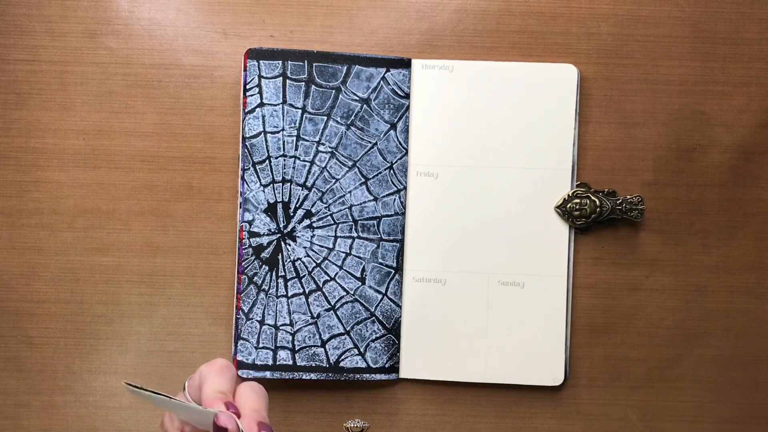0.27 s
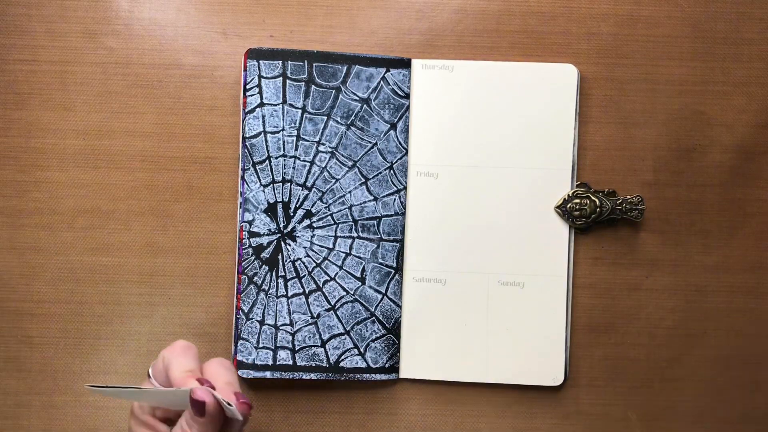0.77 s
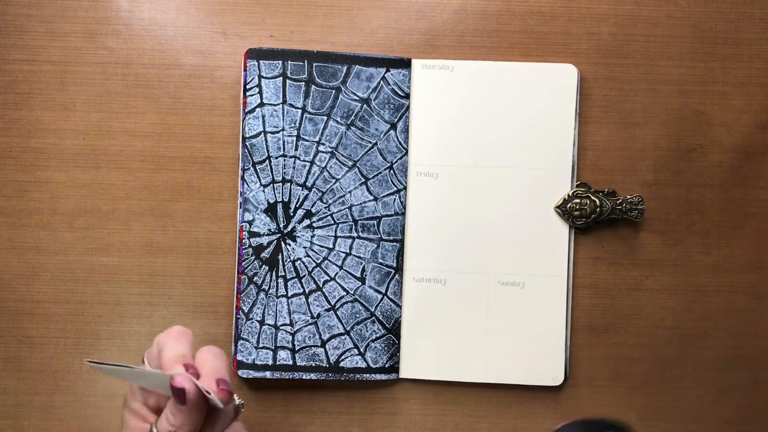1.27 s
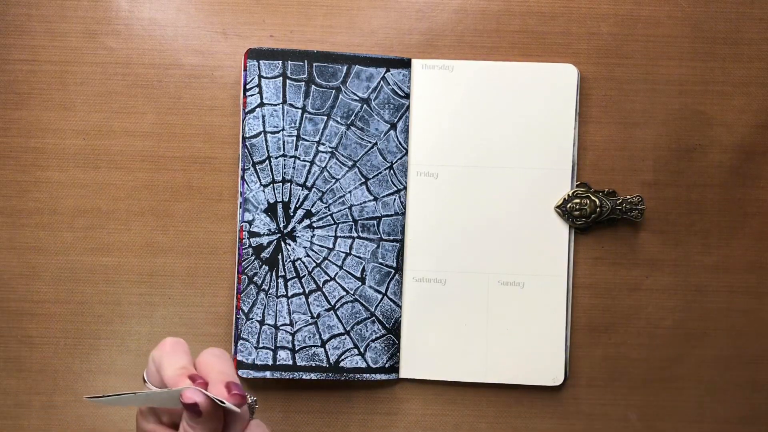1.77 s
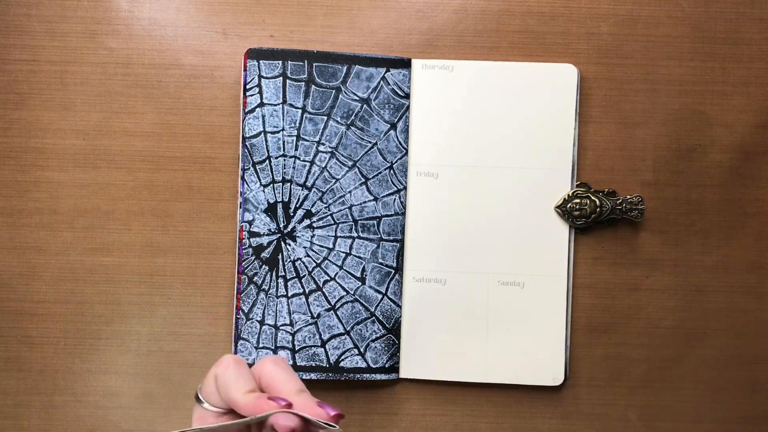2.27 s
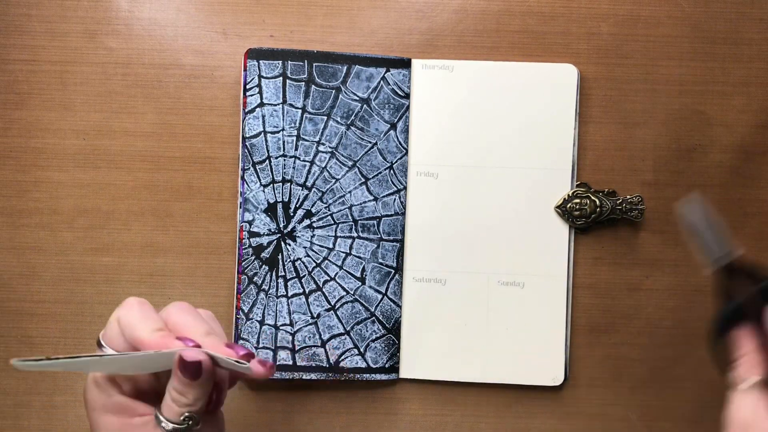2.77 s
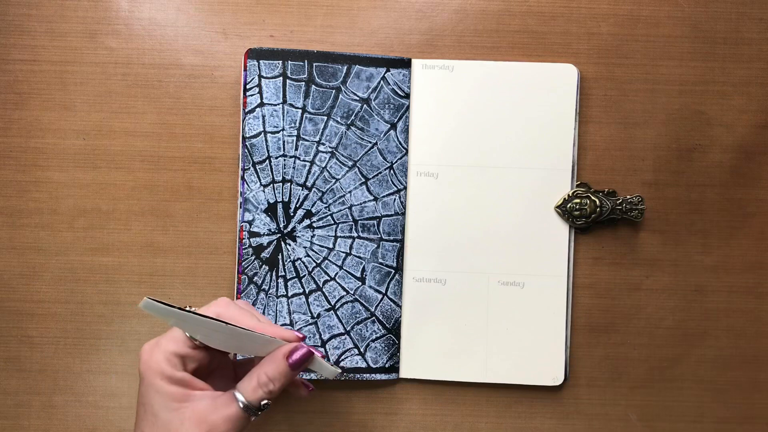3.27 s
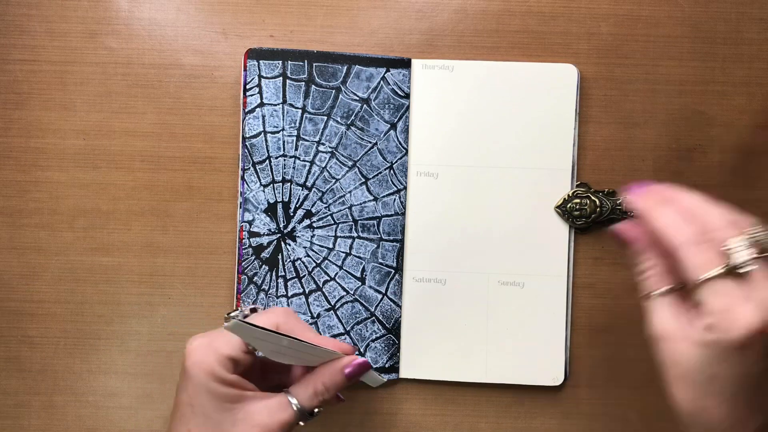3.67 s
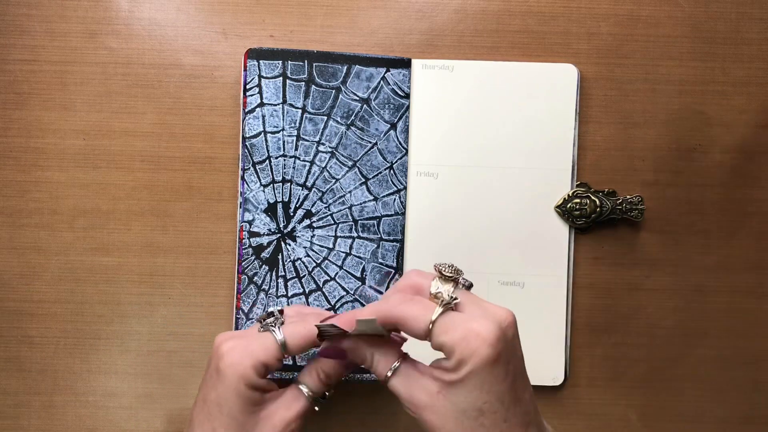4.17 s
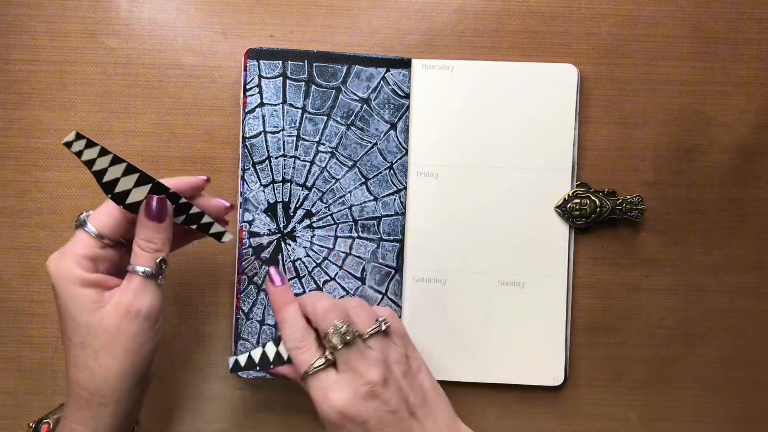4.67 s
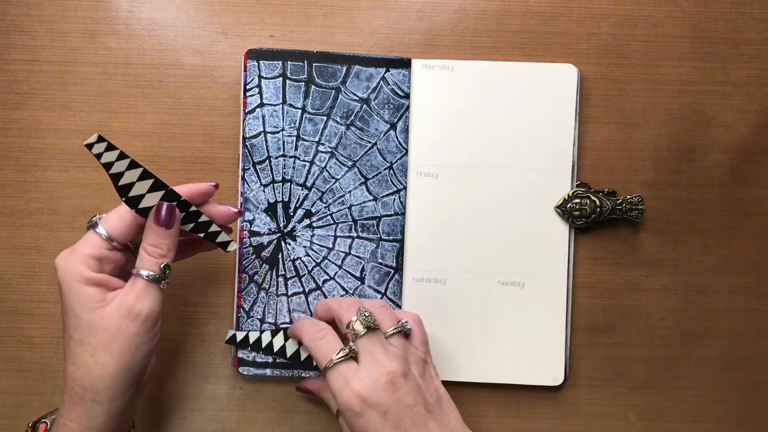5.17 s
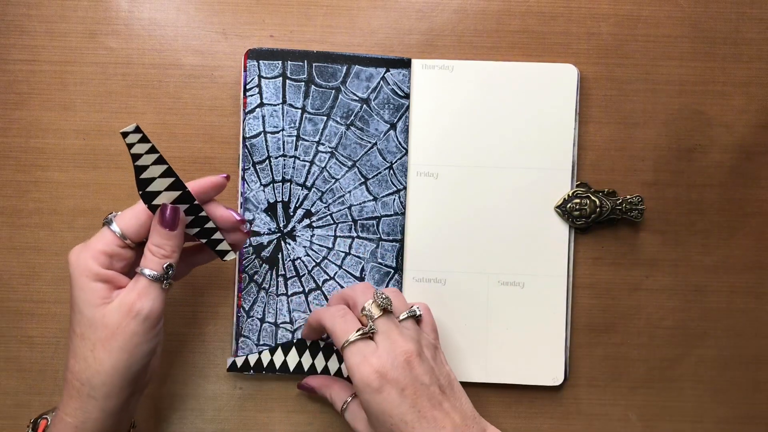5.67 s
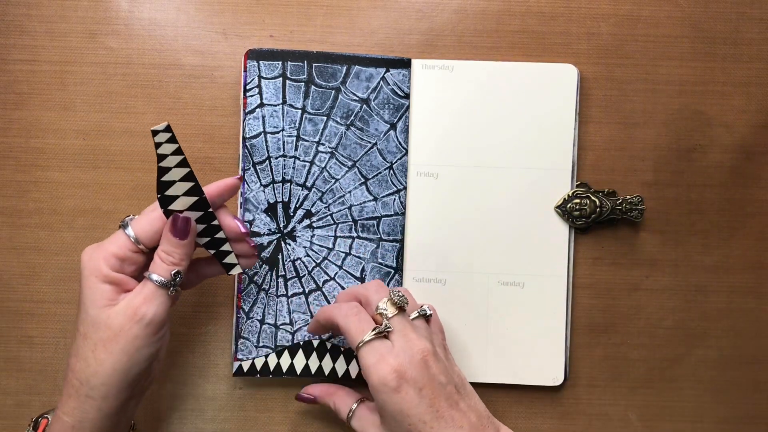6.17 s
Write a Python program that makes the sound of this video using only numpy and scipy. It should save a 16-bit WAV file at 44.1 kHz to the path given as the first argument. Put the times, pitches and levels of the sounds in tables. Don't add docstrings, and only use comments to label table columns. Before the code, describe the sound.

In a quiet room, close above a wooden desk, small scissors creak faintly and cut paper with a crisp snip. After a pause they scrape again and snap shut, by far the loudest sound. Metal ticks as they turn, jewellery clinks, and they land with a woody thump. Then a paper strip is peeled, slid over a book and smoothed with soft rasps, over low hum and hiss.

```python
import sys
import numpy as np
from scipy import signal
from scipy.fft import rfft, irfft
from scipy.io import wavfile
from scipy.ndimage import uniform_filter1d

SR = 44100
rng = np.random.default_rng(int(sys.argv[2]) if len(sys.argv) > 2 else 0)


def unload_audio(sound):
    columns = np.transpose(np.atleast_2d(sound))
    steps = np.round(np.clip(columns, -1, 1) * 32767)
    wavfile.write(sys.argv[1], SR, steps.astype(np.int16))


def ratio_of_db(decibels):
    return 10 ** (np.asarray(decibels, float) / 20)


N = 282758

# (greatest pressure t/s, level/dB, rise/s, fall/s, brightness/dB)
OPENING_STROKES = [
    (.318, -60, 0.011, 0.0063, -1.1),
    (.361, -63, 0.0088, 0.012, -2),
    (.407, -62.5, 0.0046, 0.011, -0.28),
    (.436, -79, 0.027, .025, 0),
]
CUT_STROKES = [
    (.69, -64, 0.039, .02, 4),
    (.707, -39.5, 0.013, 0.0099, 1),
    (.718, -61, .01, 0.046, -4),
    (2.016, -63.5, .05, 0.093, 1),
    (2.076, -62, .006, 0.035, 0),
    (2.092, -66, 0.025, 0.018, -5),
    (2.2, -66.5, 0.022, .01, 5),
]
TURN_STROKES = [
    (2.569, -68.5, 0.016, .015, 0),
    (2.595, -55.5, 0.0079, 0.044, -1),
    (2.626, -69, .03, .03, 10),
    (2.645, -71, .03, .06, 2),
    (2.674, -74, 0.011, 0.033, 4),
    (2.7, -71, .021, .04, 4),
]
PEEL_STROKES = [(3.94, -79.5, .012, 0.045, 6), (3.996, -60.5, 0.006, 0.036, 4.5),
                (4.055, -70, .015, 0.21, 1.5), (4.106, -70, 0.12, .04, 2), (4.18, -63.5, 0.05, 0.13, 1),
                (4.22, -63.5, 0.076, 0.22, 6), (4.3, -64, 0.15, 0.15, -2.5), (4.372, -66, 0.048, 0.057, -6),
                (4.465, -68, .03, 0.17, -0.5), (4.527, -66.5, 0.03, 0.12, -1.5), (4.63, -83, .03, .1, -8),
                (4.732, -72, 0.26, 0.13, -4.5)]
SLIDE_STROKES = [
    (4.822, -47.5, 0.0078, 0.03, 1.5),
    (4.842, -48, 0.021, 0.015, -3),
    (4.855, -70, .02, .02, -1),
]
PUSH_STROKES = [
    (4.953, -55, .003, 0.052, -2.5),
    (4.98, -60, 0.026, 0.02, -6),
    (5.012, -62.5, 0.061, .008, 0),
    (5.036, -66, 0.0035, 0.079, 0),
    (5.06, -63.5, 0.044, 0.04, 1),
    (5.088, -67.5, 0.08, 0.02, 4),
    (5.105, -79, .03, 0.027, 8),
]
SMOOTHING_STROKES = [(5.17, -74.5, 0.051, 0.17, 0), (5.277, -72, 0.22, 0.14, -0.5),
                     (5.405, -72, .04, .05, 3), (5.444, -63.5, 0.069, .025, 2.5),
                     (5.465, -67, 0.025, 0.02, 3), (5.495, -69, .05, .06, 0.5),
                     (5.533, -77, .006, 0.037, -1), (5.567, -67.5, 0.046, 0.018, -2),
                     (5.595, -61, 0.025, 0.092, 2), (5.625, -62.5, 0.072, 0.069, -1),
                     (5.657, -66, .06, .015, 9), (5.71, -71, 0.03, 0.12, -2.5), (5.8, -76.5, .1, 0.39, 0),
                     (6.162, -73, 0.054, 0.0067, 0)]
STROKE_DB = 20
CUT_SPREAD_DB = 3.5

# (t/s, peak level/dB, ring f/Hz, brightness/dB, t60/s)
HINGE_TICKS = [
    (.3558, -56, 2500, -3, 0.013),
    (.4305, -67, 5000, -2, .008),
    (3.1015, -61, 3260, -11, 0.0064),
    (3.2355, -70, 900, -20, 0.013),
]
CUT_TICKS = [(.2374, -62.5, 3300, 10, 0.0095), (.3174, -71, 12800, 5, .0086), (.4075, -60, 6740, 5, .017),
             (.7049, -36, 3920, -1, 0.0082), (.7102, -50, 4180, 3, 0.0079), (.895, -59.5, 1200, -1, 0.0083),
             (1.9844, -58, 3790, -7, 0.006), (2.0824, -40, 3800, -1, 0.041),
             (2.0878, -43, 3650, -4.5, 0.023), (2.0974, -39, 3700, -6, 0.0037),
             (2.1959, -51.5, 5240, -8, 0.012), (3.4431, -43, 2240, -6.5, 0.02)]
TURN_TICKS = [
    (2.5935, -46, 8400, -2.5, 0.008),
    (2.6244, -50, 8540, 6.5, 0.012),
    (2.6294, -48, 14400, 3.5, .008),
    (2.6678, -44, 6600, -1.5, 0.013),
    (2.6744, -48, 8200, 1, 0.013),
    (2.6814, -50, 15300, 4, 0.02),
    (2.7292, -55, 8000, 0.5, 0.0098),
]
CHARM_TICKS = [
    (1.07, -60, 14900, -1, 0.018),
    (1.0844, -49, 12070, 1.5, 0.0038),
    (1.1294, -68, 2240, 2, .014),
    (2.828, -55.5, 14800, 1, .0096),
    (2.8454, -62, 2360, -6.5, 0.024),
    (2.9272, -52.5, 14600, 9, 0.02),
    (2.9384, -55, 14100, 3, 0.032),
    (4.5286, -45, 11960, -3, 0.011),
]
PEEL_TICKS = [(3.9973, -57, 6600, 2, .006), (4.0263, -44, 5520, 0, 0.011), (4.0522, -58, 8700, 4, .005),
              (4.071, -48.5, 8600, 2, .0048), (4.1073, -51, 3350, -2, 0.0048), (4.1674, -57, 3340, 0, .006),
              (4.3193, -41, 8040, -4, 0.0035), (4.3709, -38, 2500, -6.5, 0.0045),
              (4.423, -59.5, 8300, 10.5, 0.013), (4.4598, -60, 5690, 3, .006),
              (4.6783, -58.5, 5250, 5, 0.0033), (4.7277, -59, 5560, 2, .006)]
SLIDE_TICKS = [
    (4.8098, -38, 1290, -1.5, .009),
    (4.9506, -45, 1270, -1.5, .01),
]
PAGE_TICKS = [(5.4378, -54, 3180, 0, .008), (5.4438, -50, 1820, 2, 0.015), (5.4585, -57, 3570, 4.5, .009),
              (5.5312, -52, 4080, 0, 0.025), (5.554, -60, 1250, -2, .008), (5.569, -58, 1250, -4, .01),
              (5.5855, -60, 3300, 2, .008), (5.6014, -50, 9000, 9, 0.0095), (5.628, -58, 1250, -4, .01),
              (5.6434, -55, 1900, 3, 0.012), (5.7002, -59, 1810, -2.5, .01),
              (6.1536, -64.5, 1170, -10, .0092)]

# (f/Hz, width/Hz, level/dB)
HINGE = [(800, 1400, 3), (2180, 1600, 0), (4500, 2300, -6), (6600, 620, 8.5), (8760, 1400, -2),
         (13200, 1900, 3), (15300, 1500, -4)]
STEEL = [(1480, 1340, -7.5), (2785, 690, 2), (3710, 1000, 6.5), (6250, 1420, 3), (9000, 1800, -8.5),
         (12460, 3100, -13), (14600, 2300, -7)]
PIVOT = [(2500, 690, 1), (4170, 940, -1.5), (6500, 1600, 3), (7670, 890, 2), (8730, 920, -6),
         (11480, 2000, -13), (14600, 1100, -1)]
CHARMS = [(2480, 190, -6), (3500, 6000, -14.5), (4630, 250, 5.5), (7400, 4100, -20), (9500, 500, -10),
          (12230, 760, 9), (12300, 250, 1), (13600, 1500, -10), (14400, 200, 14.5)]
STRIP = [(1300, 1220, 9.5), (3810, 3100, -1), (6150, 1500, 7), (9140, 2100, -6), (12000, 1400, -5.5),
         (14800, 1150, -1.5)]
BOOK = [(480, 370, -0.5), (1290, 130, 14), (1745, 290, 9.5), (2890, 360, 11), (3700, 500, 3),
        (4270, 500, 3), (5640, 1250, -2.5), (8200, 1500, -12), (14400, 5500, -18)]
SHEET = [(547, 290, 1.5), (1280, 170, 8.5), (1780, 480, -0.5), (2920, 350, 3.5), (3550, 450, 2.5),
         (4240, 350, 1), (5500, 650, -6), (8200, 2000, -14.5), (14400, 5500, -21)]
PAGE = [(706, 630, -5), (1240, 260, 5), (1880, 470, 1), (3200, 870, 1.5), (4270, 430, -1),
        (5330, 1650, -5.5), (8530, 1600, -9), (13200, 2600, -12)]

# (t/s, level/dB)
SNAPS = [
    (2.3223, -52.5),
    (2.3345, -59.5),
    (2.3464, -22),
    (2.3456, -4),
]
# (f/Hz, level/dB, t60/s)
BLADE_MODES = [(564, -8, 0.008), (990, -15, 0.012), (1550, -15, 0.009), (2950, -17, .006),
               (3370, 1, 0.0088), (3720, 4.5, 0.0049), (4150, -11.5, 0.009), (5240, -8.5, 0.005),
               (5800, -17, 0.0061), (6650, -6, 0.0048), (8000, -15.5, 0.0031), (9800, -6, 0.0012),
               (11580, -3.5, 0.0021), (13500, -14.5, 0.0028)]

# (middle t/s, length/s, level/dB, start f/Hz, end f/Hz)
SWISHES = [
    (4.25, 0.18, -69, 9200, 8000),
    (4.26, .1, -76, 2700, 2850),
    (4.27, 0.22, -70, 5400, 5680),
    (4.42, .1, -78, 1200, 1220),
    (4.62, .3, -77, 1200, 1250),
    (4.715, 0.1, -72.5, 4800, 6300),
    (5.26, 0.13, -74, 8750, 9800),
    (5.265, .07, -77, 11300, 11900),
    (5.555, .07, -72, 4100, 4300),
]
SWISH_WIDTH = .17

# (t/s, level/dB, length of push/s)
DROPS = [
    (3.4438, -30, 0.00046),
    (3.4462, -38, 0.00052),
    (3.4477, -37, .001),
    (3.4519, -37.5, 0.0015),
    (3.473, -42, 0.0035),
]
# (f/Hz, level/dB, t60/s)
PANEL_MODES = [(225, 1, 0.085), (323, -4, 0.13), (385, -16.5, 0.097), (484, -9.5, 0.042), (587, 1, 0.06),
               (704, -5.5, 0.043), (811, -6, 0.095), (920, 3, 0.079), (990, -10, 0.054), (1230, -3, 0.054),
               (1432, -9, 0.086), (1590, -2, 0.062), (1830, -9, 0.09), (2130, -8, 0.046)]

# (t/s, peak level/dB, hardness/dB, boom of whole top/dB, contact/s)
KNOCKS = [(0.71, -42.5, 23, -31, 0.0065), (3.102, -40.5, -6, -5, 0.021), (3.178, -43, -24, 4.5, 0.025),
          (3.235, -38.5, -6, -7, 0.066), (3.3003, -46, 11, 1, 0.018), (3.387, -47.5, 2, 3, 0.06),
          (3.407, -49, 4, -10, 0.021), (3.4437, -24, 10, 2.5, 0.014), (4.318, -52.5, 4, -24, 0.021),
          (4.83, -48, -10.5, -2.5, 0.12), (4.952, -50, -2, -22, 0.018)]
# (t/s, level/dB)
DRAG = [
    (3.11, -40),
    (3.156, -68),
    (3.188, -61.5),
    (3.378, -57),
    (3.39, -52),
    (3.428, -68),
    (3.435, -46),
]
# (f/Hz, level/dB, t60/s)
TOP_MODES = [(138.2, 7, 0.23), (175, -12, 0.41), (318.7, 8, 0.13)]
# (f/Hz, level/dB)
WOOD = [(170, -0.5), (380, 5), (700, -2), (1050, -2.5), (1600, -7.5), (2200, -26), (3000, -19), (4800, -36)]
# (t60/s, t60/s)
WOOD_T60 = (.09, .04)

# (delay t/s, level/dB)
ECHOES = [
    (.0027, -27),
    (.0055, -29),
    (.0095, -19.5),
]
# (f/Hz, t60/s)
ROOM = [(200, .12), (1000, .17), (3500, .155), (6800, .13), (10000, .13), (15000, .13)]
ROOM_DB = -14

HUM_HZ, HUM_DB, HUM_WAVER_DB = 59.1, -59.5, -1.8
# (t/s, level/dB)
MOTOR = [
    (0, -92),
    (.5, -73.5),
    (2, -74),
    (2.6, -91),
    (6.41, -80),
]
MOTOR_HZ = 105.6
# (f/Hz, level per Hz/dB)
AIR = [(20, -42.5), (42, -29.5), (80, -16), (118, -20.5), (160, -23), (400, -31), (1300, -40), (2500, -43),
       (4900, -45.5), (8000, -48.5), (10500, -48), (13000, -46), (15200, -46.5), (16500, -58.5)]
AIR_DB = -69
# (f/Hz, width/Hz, level/dB)
PORT = [(4830, 440, -1.5), (10500, 280, -3), (13300, 330, 3.5)]
TOP_HZ, EDGE_HZ = 15850, 16700


def scrape(strokes, body, low_db, high_db, slips_per_s, spread_db, smooth):
    sizes = ratio_of_db(spread_db * np.minimum(rng.exponential(1, N), 3)) * rng.standard_normal(N)
    slips = sizes * (rng.random(N) < slips_per_s / SR)
    drive = evened(slips) + smooth * rng.standard_normal(N)
    drive = drive * ratio_of_db(1.3 * slow(32.0))
    power = np.zeros((3, N))
    for s, db, rise, fall, bright_db in strokes:
        rise, fall = max(rise, .002), max(fall, .002)
        at = np.arange(round((s - 2 * rise) * SR), min(round((s + 2 * fall) * SR), N))
        away = np.maximum((s - at / SR) / rise, (at / SR - s) / fall)
        tilt_db = np.array([[low_db - bright_db], [0], [high_db + bright_db]])
        power[:, at] += ratio_of_db(db - STROKE_DB * away + tilt_db) ** 2
    busy, out = np.flatnonzero(power[1]), np.zeros(N)
    span = slice(busy[0], busy[-1])
    parts = thirds(through(body, drive[span]))
    out[span] = (np.sqrt(power[:, span]) * parts).sum(axis=0)
    return out


def ticks(rows, body, low_db, high_db):
    out, t = np.zeros(N), np.arange(3000) / SR
    noises = rng.standard_normal((len(rows), len(t)))
    for (s, db, hz, bright_db, t60), noise in zip(rows, noises):
        decay = ratio_of_db(-60 * (t / np.clip(t60, .002, .08)) ** 1.5)
        burst = noise * decay * np.minimum(t / .0004, 1)
        low, mid, high = thirds(through(body, burst) + 7.1 * resonate(burst, hz, 213.0))
        tick = ratio_of_db(low_db - bright_db) * low + mid + ratio_of_db(high_db + bright_db) * high
        add(out, s, ratio_of_db(db) * tick / abs(mid).max())
    return out


def snaps():
    out = np.zeros(N)
    blow = without_bass(ring(BLADE_MODES, .03), 2, 2600)
    for s, db in SNAPS:
        add(out, s, ratio_of_db(db) * blow / abs(blow).max())
    return out


def swishes():
    out = np.zeros(N)
    noises = rng.standard_normal((len(SWISHES), SR // 2))
    for (s, length, db, from_hz, to_hz), noise in zip(SWISHES, noises):
        count = min(round(length * SR), SR // 2)
        turns = np.cumsum(np.linspace(from_hz, to_hz, count)) / SR
        hiss = signal.lfilter(*signal.butter(2, SWISH_WIDTH * to_hz / SR), noise[:count])
        whistle = evened(hiss * np.cos(2 * np.pi * turns))
        add(out, s - length / 2, ratio_of_db(db) * whistle * np.hanning(count))
    return out


def landing():
    out = np.zeros(N)
    shares = rng.standard_normal((len(DROPS), len(PANEL_MODES)))
    for (s, db, length), share in zip(DROPS, shares):
        modes = 0
        for w, (hz, mode_db, t60) in zip(share, PANEL_MODES):
            modes = modes + np.sign(w) * ring([(hz, mode_db + 2 * abs(w), np.clip(t60, .02, .15))], .2)
        u = np.arange(200) / SR / max(length, .0003)
        hit = signal.fftconvolve(modes, np.sin(np.pi * np.minimum(u, 1)) ** 2)
        add(out, s, ratio_of_db(db) * hit / abs(hit).max())
    return without_bass(out, 3, 150)


def desk():
    out, t = np.zeros(N), np.arange(3000) / SR
    chances = rng.random((len(KNOCKS) + 1, 2, 90))
    noises = rng.standard_normal((len(KNOCKS), len(t)))
    top = ring(TOP_MODES, .25)
    boom = signal.fftconvolve(top, np.hanning(220))
    for (s, db, hard_db, boom_db, contact), noise, chance in zip(KNOCKS, noises, chances):
        push = ratio_of_db(-60 * t / max(contact, .001))
        small = signal.fftconvolve(wood(hard_db, chance), push * noise)
        add(out, s, ratio_of_db(db - 6) * small / abs(small).max())
        add(out, s, ratio_of_db(db - 6 + boom_db) * boom / abs(boom).max())
    s, db = np.transpose(DRAG)
    at = np.arange(s[0], s[-1], 1 / SR)
    noise = rng.standard_normal(len(at))
    rub = evened(signal.fftconvolve(noise, wood(1.4, chances[-1]), "same"))
    rub = rub + 1.5 * evened(signal.fftconvolve(noise, top, "same"))
    add(out, s[0], ratio_of_db(np.interp(at, s, db) - 11.5) * rub * signal.windows.tukey(len(at), .1))
    return without_bass(out, 3, 105)


def wood(hard_db, chance):
    place = (np.arange(len(chance[0])) + chance[0]) / len(chance[0])
    sign = np.sign(chance[1] - .5)
    hz = WOOD[0][0] + (WOOD[-1][0] - WOOD[0][0]) * place ** 1.5
    octaves = np.log2(hz / WOOD[0][0])
    t60 = np.interp(octaves, [0, octaves[-1]], WOOD_T60)
    t = np.arange(SR // 8)[:, None] / SR
    db = read(WOOD, hz) + octaves * hard_db / 4 - 60 * t / t60
    return (sign * ratio_of_db(db) * np.sin(2 * np.pi * hz * t)).sum(1)


def room(x):
    taps, at = np.zeros(SR // 2), np.arange(60, SR // 2 - 20, 20)
    taps[at + rng.integers(0, 20, len(at))] = rng.choice([-1., 1.], len(at))
    hz, t, z = signal.stft(taps, SR, nperseg=256)
    tail = signal.istft(z * ratio_of_db(-60 * t / read(ROOM, hz)[:, None]), SR, nperseg=256)[1]
    tail = ratio_of_db(ROOM_DB) * tail / np.linalg.norm(tail)
    tail[0] += 1
    for s, db in ECHOES:
        tail[round(s * SR)] += ratio_of_db(db)
    return signal.fftconvolve(x, tail)[:N]


def background():
    t = np.arange(N) / SR
    hum = np.sqrt(2) * ratio_of_db(HUM_DB + HUM_WAVER_DB * slow(1.7)) * np.sin(2 * np.pi * HUM_HZ * t)
    motor_line = evened(resonate(rng.standard_normal(N), MOTOR_HZ, 1.6))
    motor = ratio_of_db(np.interp(t, *np.transpose(MOTOR))) * motor_line
    f = np.fft.rfftfreq(N, 1 / SR)
    port_db = sum(db * np.exp(-((f - hz) / width) ** 2) for hz, width, db in PORT)
    hiss = irfft(rfft(rng.standard_normal(N)) * ratio_of_db(read(AIR, f) + port_db), N)
    return hum + motor + ratio_of_db(AIR_DB + 0.19 * slow(5.2)) * evened(hiss)


def evened(x):
    return x / np.sqrt(np.mean(x ** 2) + 1e-20)


def read(points, hz):
    f, value = np.transpose(points)
    return np.interp(np.log(hz + 1), np.log(f + 1), value)


def add(mix, s, sound):
    part = mix[round(s * SR):][:len(sound)]
    part += sound[:len(part)]


def without_bass(x, order, hz):
    return signal.sosfilt(signal.butter(order, hz, "high", fs=SR, output="sos"), x)


def resonate(x, hz, width):
    r = np.exp(-np.pi * width / SR)
    return signal.lfilter([1 - r, 0, r - 1], [1, -2 * r * np.cos(2 * np.pi * hz / SR), r * r], x)


def through(body, x):
    out = 0
    for k, (hz, width, db) in enumerate(body):
        once = resonate(x, hz, 1.5 * width)
        out = out + (-1) ** k * ratio_of_db(db) * resonate(once, hz, 1.5 * width)
    return out


def thirds(x):
    edges = [(500, 3000), (3000, 8000), (8000, 17000)]
    return [evened(signal.sosfilt(signal.butter(3, e, "band", fs=SR, output="sos"), x)) for e in edges]


def ring(modes, seconds):
    t = np.arange(round(seconds * SR)) / SR
    return sum(ratio_of_db(db - 60 * t / t60) * np.sin(2 * np.pi * hz * t) for hz, db, t60 in modes)


def slow(top_hz):
    noise = uniform_filter1d(rng.standard_normal(N), size=400)
    return evened(signal.lfilter([1], [1, -np.exp(-2 * np.pi * top_hz / SR)], noise))


def scene():
    steel = scrape(CUT_STROKES, STEEL, low_db=-6.5, high_db=-4.5,
                   slips_per_s=2300, spread_db=CUT_SPREAD_DB, smooth=0.67)
    steel += ticks(CUT_TICKS, STEEL, low_db=-5.5, high_db=-8.5)
    hinge = scrape(OPENING_STROKES, HINGE, low_db=-6.0, high_db=3.5,
                   slips_per_s=2000, spread_db=-11.0, smooth=0.53)
    pivot = scrape(TURN_STROKES, PIVOT, low_db=-27, high_db=-2.0, slips_per_s=700, spread_db=5.5, smooth=0.76)
    pivot += ticks(TURN_TICKS, PIVOT, low_db=-18, high_db=4.0)
    strip = scrape(PEEL_STROKES, STRIP, low_db=-7, high_db=-0.6, slips_per_s=2800, spread_db=0.5, smooth=1.0)
    strip += ticks(PEEL_TICKS, STRIP, low_db=-11.5, high_db=-1.0)
    book = scrape(SLIDE_STROKES, BOOK, low_db=3.0, high_db=-9, slips_per_s=2200, spread_db=3.5, smooth=1.0)
    book += scrape(PUSH_STROKES, SHEET, low_db=0.5, high_db=-11, slips_per_s=3000, spread_db=1.0, smooth=0.83)
    book += ticks(SLIDE_TICKS, BOOK, low_db=-1.0, high_db=-18)
    page = scrape(SMOOTHING_STROKES, PAGE, low_db=0.0, high_db=-9.5,
                  slips_per_s=1500, spread_db=2.0, smooth=1.0)
    page += ticks(PAGE_TICKS, PAGE, low_db=-9, high_db=-8)
    charms = ticks(CHARM_TICKS, CHARMS, low_db=-5, high_db=3.0)
    handles = ticks(HINGE_TICKS, HINGE, low_db=-9.0, high_db=6)
    scissors = steel + snaps() + hinge + pivot + handles
    paper = strip + book + page + swishes()
    return (room(scissors + paper + charms + landing() + desk()) + background())[None]


def roll_off(x):
    return signal.sosfilt(signal.butter(12, 16810, fs=SR, output="sos"), x)


def record(dry):
    body, whole = (signal.oaconvolve(dry, signal.firwin(401, hz, window=("kaiser", 9), fs=SR)[None], "same")
                   for hz in (TOP_HZ, EDGE_HZ))
    power = np.diff(dry, prepend=0) ** 2
    attack = uniform_filter1d(power, size=128) > 3.5 * uniform_filter1d(power, size=2048)
    opened = uniform_filter1d(attack * 1., size=128)
    mix = body + ratio_of_db(-14.5) * (whole - body) * opened
    return roll_off(mix)


dry = scene()
out = record(dry)
unload_audio(out)
```